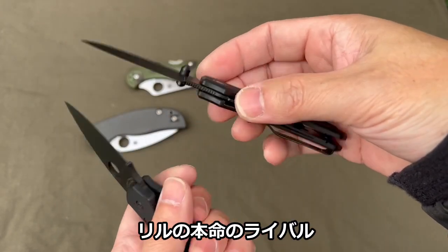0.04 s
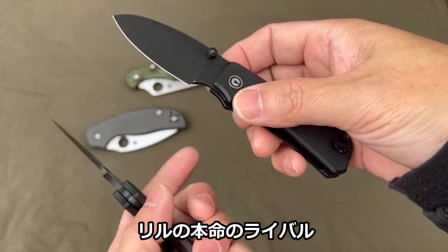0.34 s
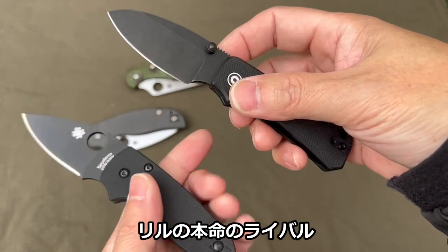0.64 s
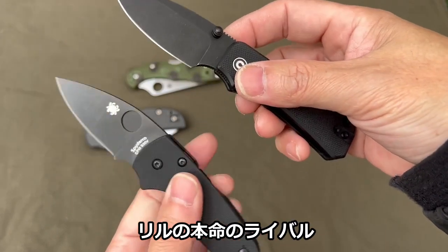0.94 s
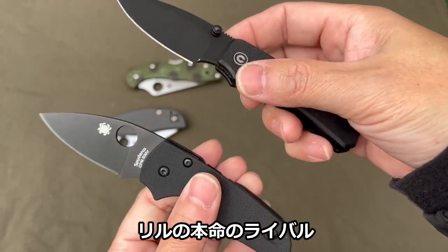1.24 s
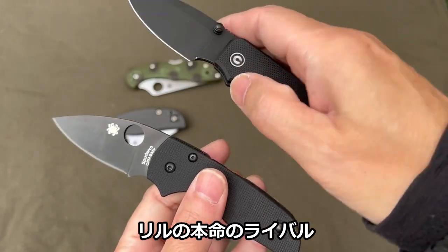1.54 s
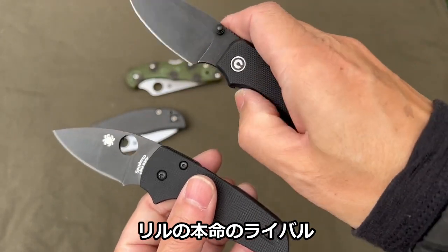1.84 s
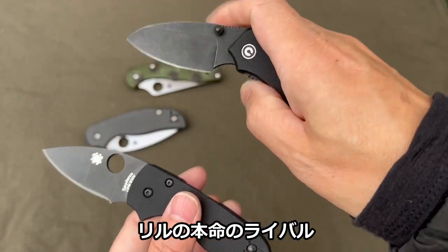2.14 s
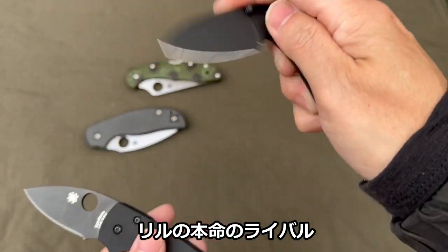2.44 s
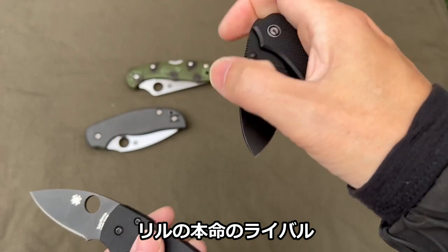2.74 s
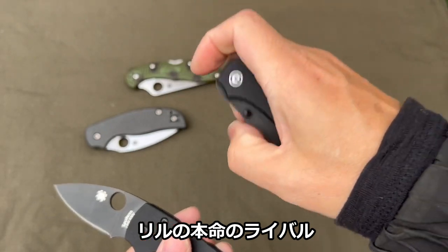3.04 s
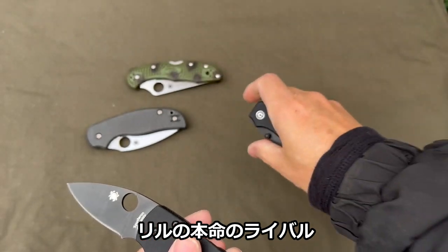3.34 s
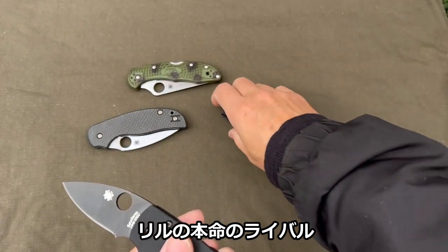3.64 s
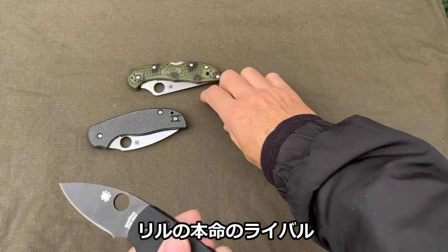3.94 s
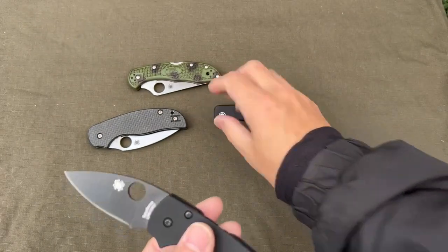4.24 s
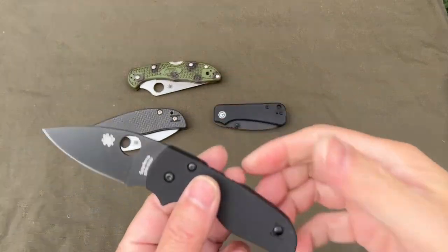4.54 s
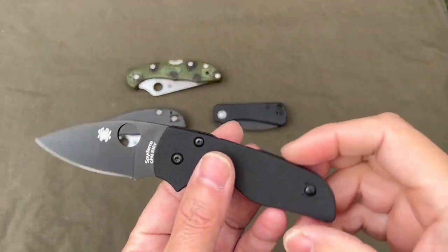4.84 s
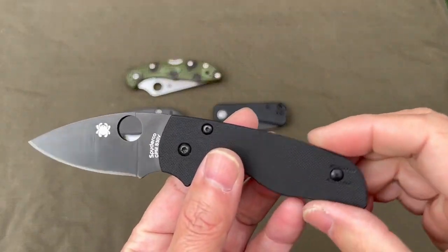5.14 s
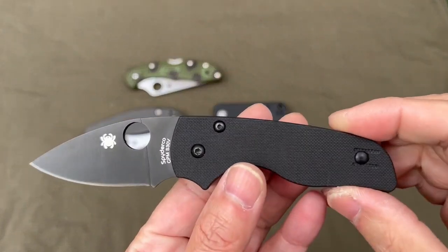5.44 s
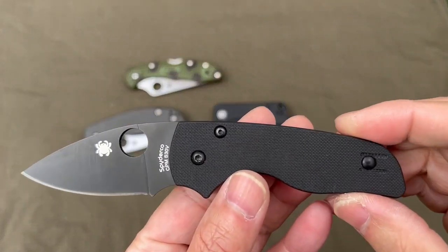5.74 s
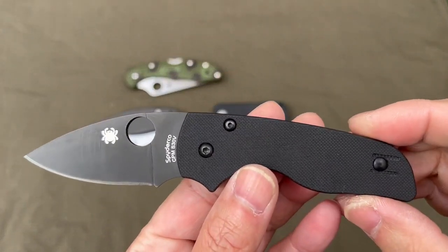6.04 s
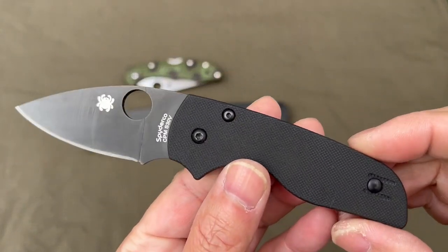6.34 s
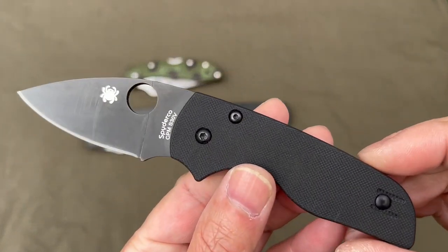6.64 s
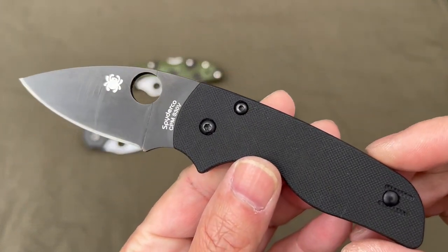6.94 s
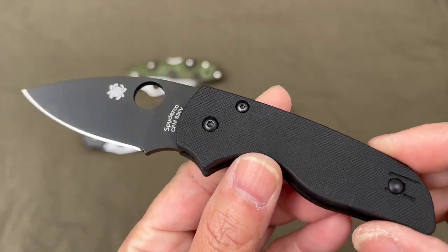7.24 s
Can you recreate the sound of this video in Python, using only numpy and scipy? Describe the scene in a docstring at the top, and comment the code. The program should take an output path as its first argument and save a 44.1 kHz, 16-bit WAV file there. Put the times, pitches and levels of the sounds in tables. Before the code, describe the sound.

In a quiet small room, two pocketknives are handled close up, with light skin rubs and tiny metallic ticks. A thumb clicks the lock aside, then a blade closes with one crisp steel snap, by far the loudest sound. A sleeve swishes gently across the cloth-covered table as that knife is set down. Dull bumps and low handling rumble follow as the second knife is turned, with faint air noise and hiss underneath.

```python
"""Fingers tick and rub on the textured grips of two folding knives, close up in a small quiet room.
Skin catches and makes a handle sing; a thumb clicks the springy lock bar aside, and one blade snaps
shut with a crack of steel and a short bright ring. A jacket sleeve swishes over the cloth-covered
table as that knife is laid down, and the hands make soft low thumps while turning the other.
Low air noise, a hum and faint hiss lie underneath."""
import sys
import numpy as np
from scipy import signal
from scipy.fft import rfft, irfft, next_fast_len
from scipy.io import wavfile
from scipy.ndimage import uniform_filter1d

SR = 44100
rng = np.random.default_rng(int(sys.argv[2]) if len(sys.argv) > 2 else 0)


def store_pcm(level_fs):
    """Save levels as 16-bit WAV."""
    pcm = np.round(np.clip(level_fs, -1, 1) * 32767).astype(np.int16)
    wavfile.write(sys.argv[1], SR, np.atleast_2d(pcm).T)


N = 325369
TIME = np.arange(N) / SR


def amp(db):
    """Decibels to gain."""
    return np.exp(np.asarray(db) * np.log(10) / 20)


def unit_rms(x):
    """Scales to rms 1."""
    return x / np.sqrt(np.mean(x ** 2) + 1e-20)


def unit_hit(x):
    """Scales a hit to the energy of one millisecond at rms 1."""
    return x / np.sqrt(np.sum(x ** 2) * 1000 / SR + 1e-20)


def curve_at(points, hz):
    """A curve's value at hz, on a log frequency axis."""
    knots_hz, values = np.transpose(points)
    return np.interp(np.log(hz + 1), np.log(knots_hz + 1), values)


def add(mix, start_s, sound):
    """Mixes a sound in at its start time."""
    part = mix[max(0, round(start_s * SR)):][:len(sound)]
    part += sound[:len(part)]


def equalise(x, db_at, size=8192):
    """Minimum-phase EQ with the gain db_at(Hz): nothing sounds ahead of an attack."""
    log_gain = np.log(amp(db_at(abs(np.fft.fftfreq(size, 1 / SR)))))
    taps = np.fft.ifft(np.exp(np.conj(signal.hilbert(log_gain)))).real
    return signal.fftconvolve(x, taps[:size // 2])


# Stereo width of noise and reverb. Each row: frequency in Hz, left-right likeness (1 is mono).
STEREO_LIKENESS = [(100, 0.98), (300, .8), (900, 0.13), (5500, 0.4), (7200, 1)]

def stereo_pair(a, b, hz):
    """Blends two unrelated spectra into a partly alike left and right."""
    likeness = np.clip(curve_at(STEREO_LIKENESS, hz), -1, 1)
    return np.array([a, likeness * a + np.sqrt(1 - likeness ** 2) * b])


def noise(spectrum):
    """Stereo noise of a given spectrum, widest in the mids."""
    size = next_fast_len(N)
    hz = np.fft.rfftfreq(size, 1 / SR)
    pair = stereo_pair(*rfft(rng.standard_normal((2, size))), hz)
    return unit_rms(irfft(pair * amp(curve_at(spectrum, hz)), size)[:, :N])


def grain(rate_hz, depth_db):
    """A random flutter in level, as a gain of rms 1."""
    chance = np.clip(rng.standard_normal(N // 20), -2.5, 2.5)
    return unit_rms(np.interp(TIME * rate_hz, np.arange(len(chance)), amp(depth_db * chance)))


def patchy(x, depth_db):
    """Resonances some 600 Hz wide and under 0.1 s long come and go as the contact shifts."""
    spectra = signal.stft(x, SR, nperseg=512)[2]
    patches = rng.standard_normal(spectra.shape[1:])
    patches = uniform_filter1d(uniform_filter1d(patches, size=7, axis=0), size=14, axis=1)
    return unit_rms(signal.istft(spectra * amp(depth_db * unit_rms(patches)), SR)[1][:, :N])


def speed(start_s, length_s):
    """A hand or arm speeds up and slows down in one arch, between 0 and 1."""
    return np.sin(np.pi * np.clip((TIME - start_s) / length_s, 0, 1)).clip(0)


def resonate(x, hz, width_hz):
    """A resonance that glides along the curve hz."""
    carrier = np.exp(2j * np.pi * np.cumsum(hz) / SR)
    pole = np.exp(-np.pi * width_hz / SR)
    return unit_rms((carrier * signal.lfilter([1 - pole], [1, -pole], x / carrier)).real)


# The room's low air and the microphone's hiss. Each row: frequency in Hz, gain in dB.
AIR_EQ = [(20, -18.5), (55, -3), (115, 2.5), (160, -7.5), (400, -17), (1600, -37.5), (3000, -66.5)]
HISS_EQ = [(300, -11), (1000, 7.5), (1900, 9), (3000, 0.5), (10000, -8), (12200, 1.5), (16000, -11.5)]

def room_tone(hum_hz=108, hum_db=-69):
    """The bed: low air noise, a wavering hum and faint hiss."""
    hum = np.sqrt(2) * np.sin(2 * np.pi * hum_hz * TIME) * grain(rate_hz=8.6, depth_db=1.0)
    return amp(-66) * noise(AIR_EQ) + amp(hum_db) * hum + amp(-83.5) * noise(HISS_EQ)


# The room's decay. Each row: frequency in Hz, seconds to fall 60 dB.
REVERB_T60 = [(200, 0.54), (5000, 0.19), (14000, 0.15)]
# The tone of its tail. Each row: frequency in Hz, gain in dB.
REVERB_EQ = [(1500, -3.5), (3000, -4.5), (6100, 2), (7400, -2.5), (9000, 2), (12500, -8), (15300, -7),
             (16300, -18)]

def reverb(x, build_s=0.0018):
    """The small room adds a short diffuse tail whose lows last longest."""
    hz, t, spectra = signal.stft(rng.standard_normal((2, SR // 2)), SR, nperseg=256)
    hz = hz[:, None]
    decay = amp(curve_at(REVERB_EQ, hz) - 60 * t / curve_at(REVERB_T60, hz))
    tail = signal.istft(stereo_pair(*spectra, hz) * decay, SR)[1]
    tail *= 1 - np.exp(-TIME[:tail.shape[1]] / build_s)
    return signal.fftconvolve(x[None], tail / np.linalg.norm(tail[0]), axes=1)[:, :N]


# The hands turn a knife over. Each row: start in seconds, length in seconds, level in dB.
HAND_TURNS = [(2.146, 0.36, -58), (5.261, 0.35, -47), (5.621, 0.6, -38), (6.153, 0.41, -57.5),
              (6.726, 0.29, -48.5), (7.064, 0.37, -43.5)]
# Their deep rumble. Each row: frequency in Hz, gain in dB.
RUMBLE_EQ = [(15, -33.5), (30, -11.5), (55, 3), (110, -12), (400, -49.5), (3000, -91.5)]

def hand_rumble(resting_db=-67):
    """The hands rumble faintly at rest, and louder the faster they turn."""
    level = amp(resting_db) + sum(amp(db) * speed(start, length) for start, length, db in HAND_TURNS)
    return noise(RUMBLE_EQ) * level * grain(rate_hz=35, depth_db=4.0)


# Soft bumps of hands, wrists and knife. Each row: start in seconds, level in dB, pitch in Hz.
HAND_BUMPS = [(2.189, -43, 59), (2.703, -56, 444), (2.902, -41.5, 245.6), (3.531, -39.5, 58),
              (3.787, -60.5, 540), (4.191, -60, 476), (5.172, -42, 57.4), (5.723, -33, 149),
              (5.728, -31.5, 63.6), (5.934, -31.5, 118), (5.936, -25.5, 60.8), (6.416, -42.5, 96.6),
              (6.925, -37, 57.7), (7.201, -40.5, 121.5), (7.206, -26, 71)]

def thumps(rise_cycles=0.52, padding_s=0.00078):
    """A padded bump swells and dies within a few slow cycles."""
    t, out = np.arange(SR // 4) / SR, np.zeros(N)
    for start, db, hz in HAND_BUMPS:
        age = t / (padding_s + rise_cycles / hz)
        swell = (age * np.exp(1 - age)) ** 2
        add(out, start, amp(db) * swell * np.sin(2 * np.pi * hz * t))
    return out


# Changes of hold. Each row: start in seconds, level in dB, attack in seconds.
HOLD_SHIFTS = [(5.318, -60.5, 0.011), (5.35, -71.5, 0.017), (5.458, -71, 0.026), (6.52, -76, 0.045),
               (7.1, -68, 0.039)]
# The dull tone of palm on handle. Each row: frequency in Hz, gain in dB.
PALM_EQ = [(100, -9), (400, 8), (900, 1), (1500, -1), (2600, -23.5), (8000, -43)]

def palm_rubs():
    """The palm rubs the handle as the hold shifts, swelling quickly and fading."""
    level = np.zeros(N)
    for start, db, attack in HOLD_SHIFTS:
        age = np.maximum(TIME - start, 0) / attack
        level += amp(db) * age * np.exp(1 - age)
    return level * noise(PALM_EQ) * grain(rate_hz=160, depth_db=1.5)


# Arm sweeps. Each row: start in seconds, length in seconds, level in dB, fizz boost in dB.
ARM_SWEEPS = [(1.194, 2.16, -85.5, 6.5), (2.057, 0.555, -70.5, 3), (3.037, 1.46, -75, -0.5),
              (3.407, 0.21, -79.5, 7), (3.966, 0.12, -71, -10), (4.15, 0.4, -68.5, 3.5),
              (4.384, 0.39, -71.5, 2.5), (4.555, 0.64, -78.5, 1)]
# The sleeve's soft body and the fizz of its fine weave. Each row: frequency in Hz, gain in dB.
SLEEVE_BODY_EQ = [(100, -18), (350, 4.5), (1500, 1.5), (2500, -7.5), (8000, -30)]
SLEEVE_FIZZ_EQ = [(500, -10), (2000, 3), (3500, 0.5), (6500, -4), (9800, -9.5), (12000, 2), (15300, -3),
                  (16300, -20)]

def sleeve(body_exponent=0.8, fizz_exponent=0.44):
    """A sleeve brushes the cloth: it fizzes as soon as the arm moves and gains body with speed."""
    body_power, fizz_power = np.zeros((2, N))
    for start, length, db, fizz_db in ARM_SWEEPS:
        arm = speed(start, length)
        body_power += (amp(db) * arm ** body_exponent) ** 2
        fizz_power += (amp(db + fizz_db) * arm ** fizz_exponent) ** 2
    body = amp(-0.82) * patchy(noise(SLEEVE_BODY_EQ), depth_db=1.7) * np.sqrt(body_power)
    body *= grain(rate_hz=38, depth_db=1.0)
    fizz = amp(-2.5) * patchy(noise(SLEEVE_FIZZ_EQ), depth_db=1.1) * np.sqrt(fizz_power)
    return (body + fizz) * grain(rate_hz=190, depth_db=1.15)


# Fingers slide along the grips. Each row: start in seconds, length in seconds, level in dB,
# the handle's singing pitch in Hz, singing over scrape in dB.
FINGER_STROKES = [(0.005, 0.17, -67.5, 2950, -9), (0.18, 0.24, -71.5, 4070, -7.5),
                  (0.39, 0.18, -72, 5040, -1), (0.6, 0.075, -68.5, 5030, 0), (0.702, 0.24, -76, 4550, -1.5),
                  (0.922, 0.21, -83, 4420, -14), (1.188, 0.14, -83.5, 4550, -3),
                  (1.234, 0.12, -80.5, 6400, -8), (1.377, 0.085, -70.5, 4430, -12),
                  (1.489, 0.075, -71.5, 8560, -7.5), (1.893, 0.13, -68.5, 4370, -13),
                  (2.118, 0.043, -65.5, 3860, -5), (2.463, 0.203, -72, 3120, -8.5),
                  (4.892, 0.037, -72, 5390, -12), (7.171, 0.17, -79, 1910, 0)]
# The scrape of skin on the grip. Each row: frequency in Hz, gain in dB.
GRIP_EQ = [(1500, -11), (2400, -2.5), (4500, -3), (7000, -6), (9800, -9), (11700, -2.5), (15300, -6.5),
           (16300, -22)]

def fingers(press_s=0.015, lift_s=0.021, sing_width_hz=380, sag_per_s=0.22):
    """Skin catches on the texture; the handle sings at a pitch set by the hold, sagging as it slides."""
    scrape = patchy(noise(GRIP_EQ), depth_db=4.0)
    drive, out = noise(GRIP_EQ), np.zeros((2, N))
    for start, length, db, sing_hz, sing_db in FINGER_STROKES:
        span = slice(max(0, round((start - length) * SR)), round((start + 2 * length) * SR))
        t = TIME[span] - start
        pressure = .25 * (1 + np.tanh(t / press_s)) * (1 + np.tanh((length - t) / lift_s))
        singing = resonate(drive[:, span], sing_hz * (1 - sag_per_s * t), sing_width_hz)
        out[:, span] += amp(db) * pressure * (scrape[:, span] + amp(sing_db) * singing)
    return out * grain(rate_hz=430, depth_db=1.0) * grain(rate_hz=46, depth_db=3.0)


# Ticks and short scrapes. Each row: start in seconds, level in dB, attack in seconds,
# ring pitch in Hz, ring over scratch in dB.
TICK_SLIPS = [(0.07, -42, 0.012, 5420, 22.5), (0.186, -49, 0.007, 4530, 7.5),
              (.489, -50.5, 0.0077, 5400, -4), (0.614, -53, 0.019, 6140, 13),
              (1.683, -57.5, 0.0095, 4900, 3), (1.955, -41, 0.0033, 4400, 8),
              (2.548, -47, 0.0033, 14600, 17), (2.589, -48.5, 0.011, 12700, 19),
              (4.3626, -56.5, 0.00047, 4300, 11), (4.6411, -47.5, 0.00064, 5240, 5),
              (4.639, -52, 0.0018, 1920, 30), (5.045, -62.5, 0.012, 4500, 12),
              (5.143, -55.5, 0.0084, 4510, 16), (5.144, -56.5, 0.0059, 1890, 38),
              (7.235, -59, 0.00085, 4410, 7), (7.261, -58.5, 0.013, 4360, 11)]
# The bright scratch of steel or nail. Each row: frequency in Hz, gain in dB.
SCRATCH_EQ = [(100, -8), (1400, -10), (2900, -3), (4300, 2.5), (6400, -3.5), (8200, 7.5), (9600, -4.5),
              (11500, 2.5), (15300, -2.5), (16300, -19)]

def ticks(ring_width=0.073, rough_db=4):
    """Steel or nail slips: a burst of tiny contacts sounds through one resonance of the knife."""
    t, out = np.arange(SR // 8) / SR, np.zeros(N)
    for start, db, attack, ring_hz, ring_db in TICK_SLIPS:
        contacts, sizes = rng.standard_normal((2, len(t)))
        burst = contacts * amp(rough_db * sizes) * t / attack * np.exp(-t / attack)
        resonance = lambda hz: amp(ring_db) / (1 + ((hz / ring_hz - 1) / ring_width) ** 2)
        tone_db = lambda hz: curve_at(SCRATCH_EQ, hz) + 20 * np.log10(1 + resonance(hz))
        add(out, start, amp(db) * unit_hit(equalise(burst, tone_db)))
    return out


# The blade beams some bands to one side. Each row: frequency in Hz, left over right in dB.
BLADE_PAN = [(250, -1), (750, 7.5), (3000, -4), (5000, -0.5), (6600, 3.5), (9000, 0)]

def strike(blows, pitches, crack_eq, crack_db, ring_send_db, crack_send_db, off_centre_db=-22):
    """Each blow on steel cracks and rings the pitches near its centre; both feed the reverb."""
    t = np.arange(SR // 10) / SR
    rings, cracks = np.zeros((2, N))
    for start, db, centre_hz, octaves, decay_scale in blows:
        bell = lambda hz: np.exp(-.5 * (np.log2((hz + 1) / centre_hz) / octaves) ** 2)
        focus_db = lambda hz: off_centre_db * (1 - bell(hz))
        ring = sum(amp(ring_db - 60 * t / (t60 * decay_scale)) * np.sin(2 * np.pi * hz * t)
                   for hz, ring_db, t60 in pitches)
        burst = 0.12 * rng.choice([-1., 1.], len(t)) * np.exp(-t / .0004)
        burst[0] = 1  # one firm contact, then a brief chatter
        crack = equalise(burst, lambda hz: curve_at(crack_eq, hz) + 0.61 * focus_db(hz))
        add(rings, start, amp(db) * unit_hit(equalise(ring, focus_db)))
        add(cracks, start, amp(db + crack_db) * unit_hit(crack))
    direct = np.array([equalise(rings + cracks, lambda hz: side * curve_at(BLADE_PAN, hz))[:N]
                       for side in (.5, -.5)])
    return direct + reverb(amp(crack_send_db) * cracks + amp(ring_send_db) * rings)


# The lock lets go in a double click. Each row: start in seconds, level in dB, centre in Hz,
# width in octaves, ring time multiplier.
LOCK_BLOWS = [(1.9587, -45.5, 4800, 2, .4), (1.9734, -40, 14000, 0.56, 2.3),
              (1.9739, -34.5, 5700, 0.62, 1.1)]
# The springy lock bar's ring. Each row: pitch in Hz, level in dB, seconds to fall 60 dB.
LOCK_RING = [(3560, 2, .008), (5040, -6, 0.0056), (5500, -5.5, 0.01), (5800, -5, .007), (6040, -4, 0.0093),
             (11100, -6, .003), (12400, -1, .004), (15050, 5, .005)]
# Its dry crack. Each row: frequency in Hz, gain in dB.
LOCK_CRACK_EQ = [(1500, -11.5), (3400, -5), (5500, -5.5), (7400, -8), (11200, 2), (16000, -1)]

def lock_release():
    """The thumb pushes the lock bar aside; its bright ring hangs in the room."""
    return strike(LOCK_BLOWS, LOCK_RING, LOCK_CRACK_EQ, crack_db=-2, ring_send_db=-18, crack_send_db=-24)


# The blade jumps the detent, meets its stop and bounces. Each row: start in seconds, level in dB,
# centre in Hz, width in octaves, ring time multiplier.
BLADE_BLOWS = [(2.90135, -14, 13300, 0.46, 1), (2.9019, -18, 3100, 0.28, 1),
               (2.9028, -19.3, 8300, 0.62, 1.1), (2.90398, -21, 12600, 0.33, 1),
               (2.9048, -26.5, 4895, 0.4, 0.7)]
# Pitches in the snap's ring; the four near 12.8 kHz form one broad, brief, bright ring.
# Each row: pitch in Hz, level in dB, seconds to fall 60 dB.
SNAP_RING = [(2930, 0, .015), (3170, -1, .015), (3450, -1, .009), (4310, -2, .011), (4975, -3, .009),
             (5550, -8, .009), (5955, -7, .018), (6330, -8, .018), (7595, -3, .015), (8400, -1, .012),
             (8960, 0, .011), (12215, -4, .006), (12640, -1, .006), (12960, -2, .005), (13350, -5, .006),
             (15450, -4, .004)]
# The crack of steel on steel. Each row: frequency in Hz, gain in dB.
SNAP_CRACK_EQ = [(100, -15.5), (450, -9), (1300, -19.5), (2200, -23), (3000, -2), (3750, -3.5), (4700, 2),
                 (8500, 3), (10800, -1), (12800, 2.5), (15800, 4)]

def blade_snap():
    """The blade swings shut and its blows fuse into one snap; the room mostly answers the crack."""
    return strike(BLADE_BLOWS, SNAP_RING, SNAP_CRACK_EQ,
                  crack_db=-3.5, ring_send_db=-19, crack_send_db=-13)


def scene():
    """Knife sounds in the room, over handling noise and room tone."""
    slips = ticks()
    steel = blade_snap() + lock_release() + slips + amp(-13.5) * reverb(slips)
    handling = fingers() + sleeve() + palm_rubs() + thumps() + hand_rumble()
    return steel + handling + room_tone()


# Phase between the microphone's two ports. Each row: frequency in Hz, right-side lag in radians.
MIC_LAG = [(150, 0.28), (1300, 1.07), (3200, 0.68), (7300, 1.3), (9400, -2.5), (12800, -5.5), (14200, -6),
           (16000, -9)]
# The microphone leans left. Each row: frequency in Hz, left over right in dB.
MIC_PAN = [(120, 0.95), (400, 3), (1500, 3.5), (5400, 6), (7200, 1), (9500, 0)]

def record(dry, cutoff_hz=16700):
    """Sound reaches the two ports out of step, its mids louder on the left; a low-pass trims the top."""
    size = next_fast_len(N)
    lag = np.exp(-1j * curve_at(MIC_LAG, np.fft.rfftfreq(size, 1 / SR)))
    shifted = irfft(rfft(dry[1], size) * lag, size)
    left = equalise(dry[0], lambda hz: .5 * curve_at(MIC_PAN, hz))[:N]
    right = equalise(shifted, lambda hz: -.5 * curve_at(MIC_PAN, hz))[:N]
    lowpass = signal.firwin(255, cutoff_hz, window=("kaiser", 8), fs=SR)
    return signal.oaconvolve(np.array([left, right]), lowpass[None], "same")


dry = scene()
out = record(dry)
store_pcm(out)
```